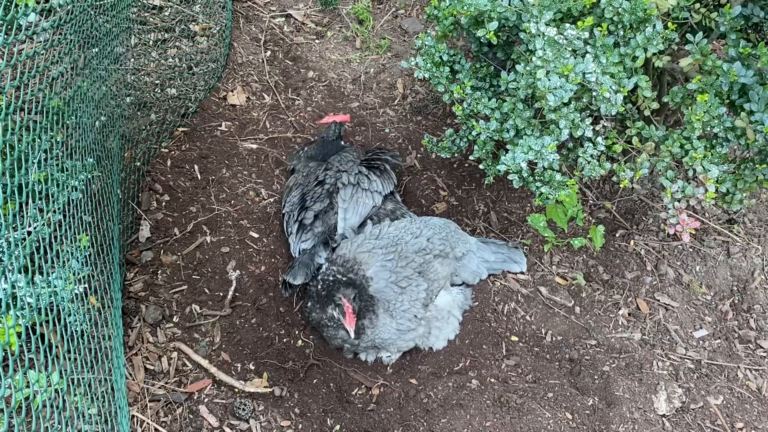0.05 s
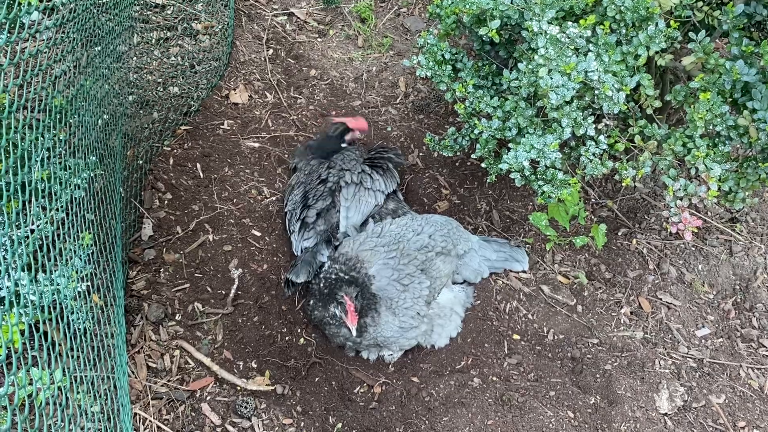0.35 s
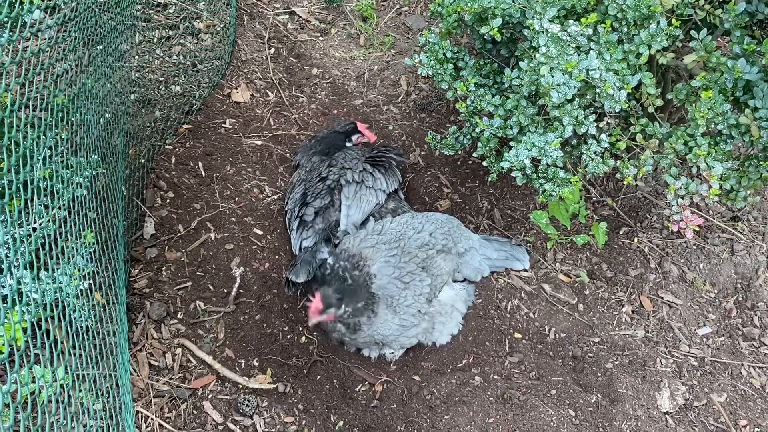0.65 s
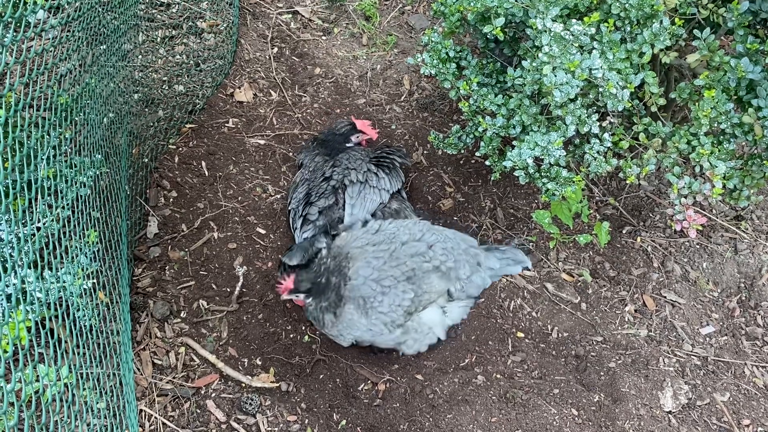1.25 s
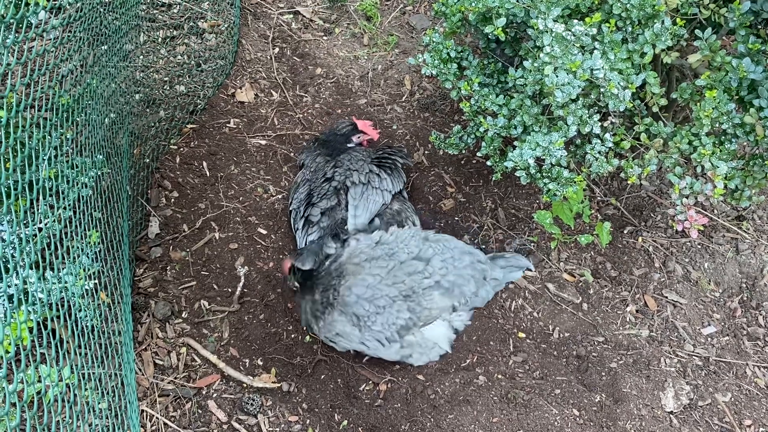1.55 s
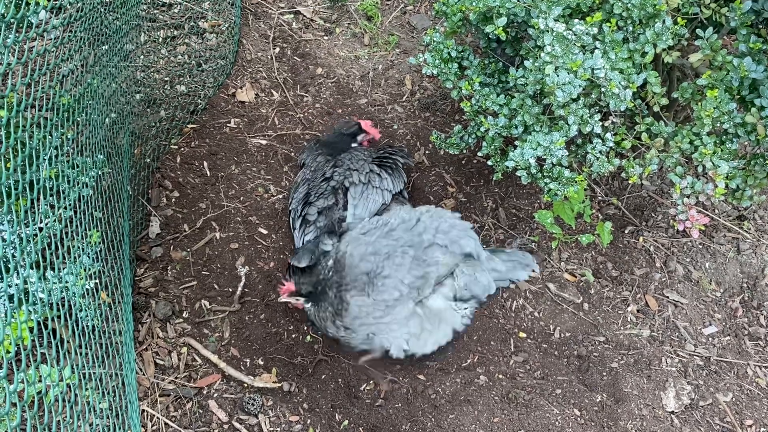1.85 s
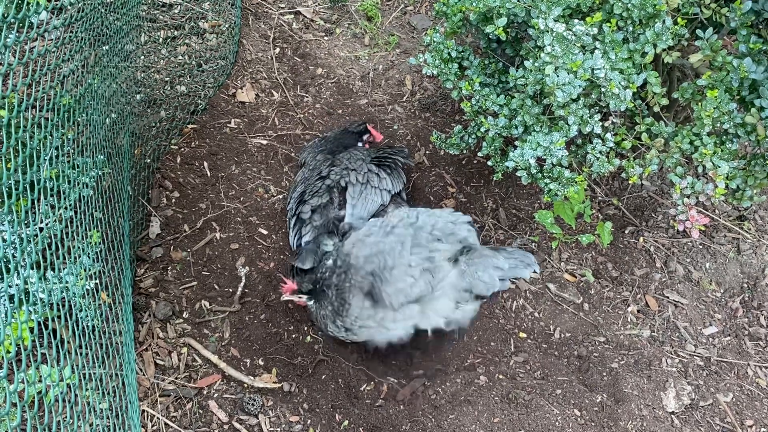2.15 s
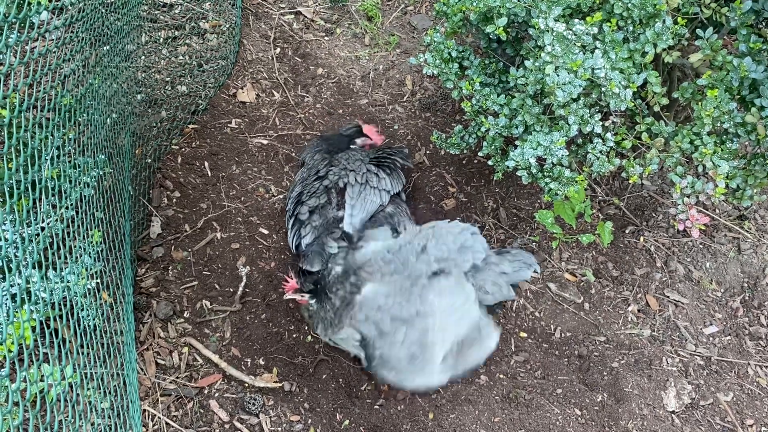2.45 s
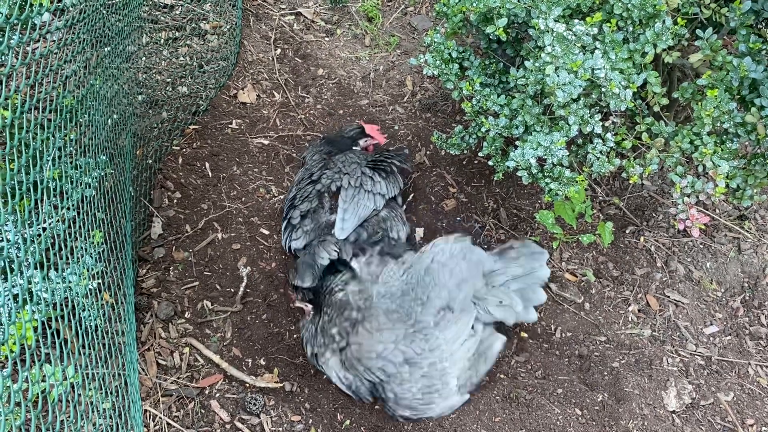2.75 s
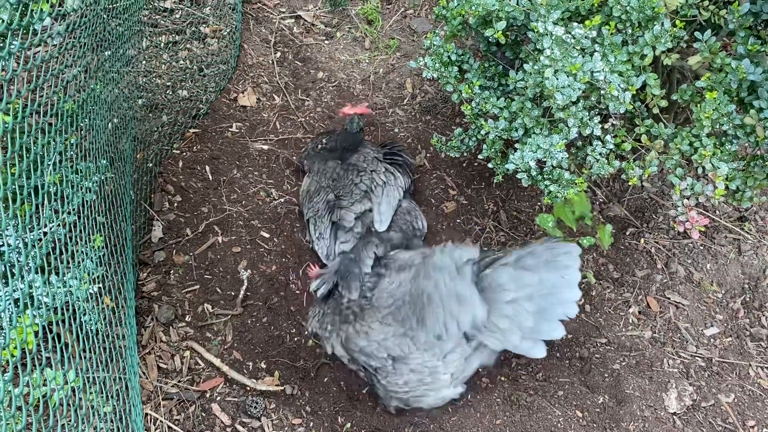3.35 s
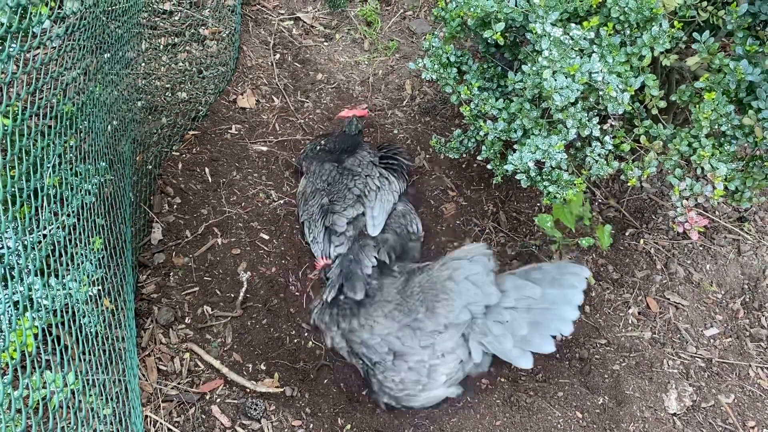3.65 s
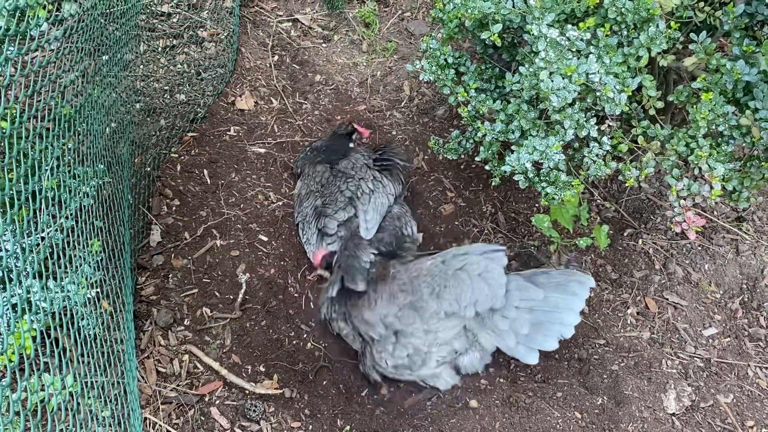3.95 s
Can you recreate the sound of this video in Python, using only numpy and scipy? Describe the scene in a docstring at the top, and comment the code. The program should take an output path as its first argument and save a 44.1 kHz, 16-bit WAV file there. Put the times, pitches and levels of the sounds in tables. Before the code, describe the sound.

Hens rustle their feathers in dry soil close by: a soft swish at about 0.6 seconds fades, then quick bursts run from 2 seconds to the end. Crumbs tick from 1.5 seconds. A small bird on the left chirps near 1.5, 2.8 and 3.9 seconds, with fainter notes farther off. Wind rumbles and thumps on the microphone, most at the start and around 3 seconds, over distant traffic hum.

```python
"""Hens dust-bathing in a yard

Close below the microphone, two hens shuffle and ruffle their feathers in dry soil, flicking up
crumbs that tick as they land. A small bird chirps three times from the trees on the left, with fainter
falling notes farther off. Distant traffic hums; light wind rumbles and thumps on the microphone."""
import sys
import numpy as np
from scipy import signal
from scipy.fft import rfft, irfft, next_fast_len
from scipy.io import wavfile
from scipy.ndimage import uniform_filter1d, map_coordinates

SR = 44100
rng = np.random.default_rng(int(sys.argv[2]) if len(sys.argv) > 2 else 0)


def put_to_file(sound):
    """Save the sound as 16-bit audio at rate SR, in the file named by the first command-line argument."""
    columns = np.atleast_2d(sound).T  # one column per channel
    safe = np.clip(columns, -1, 1)
    whole_steps = np.round(safe * 32767)
    wavfile.write(sys.argv[1], SR, whole_steps.astype(np.int16))


N = 176400

# Levels in the tables are relative: each source sets its own gain on top.
# feathers rubbing over soil: time_s, level_db
FEATHER_LEVEL = [(0, -102), (.5, -100), (.58, -72), (.66, -64), (.82, -67), (1.05, -68.5), (1.3, -73),
                 (1.6, -76), (1.69, -77), (1.86, -81), (1.94, -74), (2.02, -93), (2.1, -72), (2.17, -88),
                 (2.27, -70), (2.33, -75.5), (2.42, -76.5), (2.51, -68), (2.56, -72), (2.63, -67.5),
                 (2.71, -75.5), (2.87, -64.5), (2.93, -70), (3.01, -73), (3.06, -62.5), (3.11, -70),
                 (3.19, -71.5), (3.27, -66.5), (3.36, -68.5), (3.44, -76), (3.5, -62), (3.55, -68.5),
                 (3.61, -64.5), (3.66, -72.5), (3.73, -65), (3.85, -67.5), (4, -76)]
# tone of the swish: frequency_hz, density_db
FEATHER_SPECTRUM = [(600, -16), (1500, 11), (2600, 8.5), (4000, 4.5), (5500, 3.5), (7400, 2), (8300, 6.5),
                    (9900, 3.5), (11200, 1.5), (12300, -12), (13200, -17.5), (14200, -19), (15200, -29)]
# left-right likeness of the swish: frequency_hz, coherence
FEATHER_COHERENCE = [(2000, 0.35), (4000, 0.45), (6500, 1), (7600, 0.57), (8300, 0.98), (10000, 0.87),
                     (10700, .99)]
# crumbs and twigs ticking: start_s, peak_db, centre_hz, t60_s
CRUMB_TICKS = [(1.505, -52, 9000, .012), (1.552, -45.5, 6960, .012), (1.718, -59, 8000, 0.019),
               (1.734, -51.5, 6790, 0.033), (1.734, -53, 2760, 0.022), (1.891, -52, 5930, 0.0088),
               (1.928, -54, 6500, .009), (1.942, -58, 7000, .012), (2.059, -47, 10000, 0.013),
               (2.108, -59, 6500, 0.018), (2.150, -51, 6140, 0.031), (2.206, -59, 3900, .009),
               (2.251, -54, 11000, .01), (2.263, -52, 9500, 0.025), (2.275, -55, 7000, .026),
               (2.315, -57, 5500, .009), (2.75, -53, 5900, 0.012), (3.22, -50.5, 5200, 0.012),
               (3.772, -42.5, 6640, .013), (3.894, -45, 2400, 0.019)]
# tone shared by all ticks: frequency_hz, gain_db
CRUMB_COLOUR = [(2000, 7), (9000, 3.5), (11500, -1.5), (13500, -17), (16000, -14)]
# how far the left microphone port leads for sound from the hens: frequency_hz, phase_rad
LEFT_PORT_LEAD = [(0, 1), (1800, -1.5), (3300, 2.5), (3900, 0.64), (4900, 0.87), (5900, 0.47), (7000, 0.5),
                  (8100, -3), (9200, -4.5), (10500, -6), (11600, -26), (12700, 5.5), (14100, -21),
                  (15000, -7)]

# one chirp, a thin lead-in then a high and a lower arch: offset_s, pitch_hz, level_db
CHIRP_SHAPE = [(-.024, 5450, -26), (-.006, 5200, -17), (-.002, 5250, -35), (0, 3500, -20), (.005, 3820, 0),
               (.011, 4050, 0), (.016, 4400, -4), (.022, 4520, -1), (.027, 4150, -4), (.031, 3500, -4),
               (.036, 2950, -8), (.044, 3100, -9), (.052, 2800, -14), (.061, 3050, -5), (.069, 3280, -9),
               (.076, 3560, -4), (.082, 3730, -4), (.088, 3150, -4), (.098, 2950, -9), (.114, 2500, -20)]
# chirps from the trees: time_s, level_db, length_ratio
NEAR_CHIRPS = [(1.485, -51, 1.01), (2.751, -49, 0.99), (3.88, -50.5, .97)]
# falling notes farther off: start_s, length_s, start_hz, end_hz, level_db
FAR_NOTES = [(0.696, 0.03, 4220, 3650, -68), (0.749, 0.038, 3100, 2580, -61.5),
             (1.62, 0.046, 3300, 2750, -65.5), (3.089, .048, 4350, 3450, -63),
             (3.132, 0.046, 3300, 2750, -60)]

# deep wind rumble on the microphone: time_s, level_db
WIND_RUMBLE_LEVEL = [(0, -32), (.1, -31.5), (.42, -36), (.7, -31), (.85, -46), (1.26, -48.5), (1.36, -39),
                     (1.5, -38), (1.57, -41.5), (1.7, -34.5), (1.84, -42.5), (1.96, -39.5), (2.13, -30),
                     (2.19, -40.5), (2.4, -35), (2.48, -47), (2.55, -37), (2.73, -43.5), (2.81, -30.5),
                     (2.87, -40.5), (2.98, -32), (3.08, -27), (3.3, -33), (3.5, -36.5), (3.65, -41),
                     (4, -39)]
# tone of the rumble: frequency_hz, density_db
RUMBLE_SPECTRUM = [(12, -40), (25, -18.5), (45, 4.5), (65, 9), (95, 3.5), (130, -4), (200, -29),
                   (400, -78.5), (1500, -120)]
# wind flutter above the rumble: time_s, level_db
WIND_FLUTTER_LEVEL = [(0, -40), (.12, -40), (.2, -46.5), (.3, -36.5), (.52, -41), (.7, -44.5), (.88, -48.5),
                      (1.4, -49), (1.7, -52.5), (2.1, -46.5), (2.6, -49), (3.0, -46.5), (3.04, -30),
                      (3.15, -39), (3.22, -36.5), (3.38, -45), (3.58, -43), (3.8, -40.5), (4, -40.5)]
# tone of the flutter: frequency_hz, density_db
FLUTTER_SPECTRUM = [(15, -57), (50, -59.5), (100, -3.5), (140, -1), (200, -6.5), (300, -13), (450, -25.5),
                    (800, -55.5), (2000, -75), (5000, -120)]
# left-right likeness of the wind: frequency_hz, coherence
WIND_COHERENCE = [(30, 1), (100, 0.74), (300, 0.55)]
# sudden puffs on the microphone: start_s, level_db, mid_pitch_hz
WIND_PUFFS = [(0.011, -18.5, 81.5), (0.067, -24.5, 125.4), (0.134, -26, 84.5), (.229, -26, 150),
              (0.297, -26, 150), (.311, -28, 150), (0.357, -23, 80), (.466, -27.5, 200), (.471, -19, 68),
              (.516, -22.5, 171), (0.561, -24, 76), (0.665, -26.5, 64), (1.499, -27, 88.5),
              (1.694, -30.5, 100), (3.013, -18.5, 160), (3.033, -19.5, 130), (3.064, -30, 195),
              (3.074, -22.5, 100), (3.094, -25.5, 125), (3.111, -21, 105), (3.127, -18, 98),
              (3.147, -28, 185), (3.175, -29.5, 170), (3.187, -26.5, 90), (3.205, -24.5, 175),
              (3.217, -22.5, 160), (3.232, -31, 185), (3.247, -32, 115), (3.296, -20, 116),
              (3.635, -29, 142), (3.758, -31, 137), (3.787, -29, 104), (3.837, -24.5, 160),
              (3.897, -29, 201)]

# hum of distant traffic: time_s, level_db
HUM_LEVEL = [(0, -51), (.5, -48), (1.2, -46.5), (1.8, -47), (2.6, -46), (3.3, -47), (4, -45)]
# tone of the hum: frequency_hz, density_db
HUM_SPECTRUM = [(15, -17), (30, -4.5), (100, 7), (250, 2), (480, -1), (700, 3), (950, 2.5), (1250, -5.5),
                (1600, -10.5), (2000, -19), (3000, -26), (4500, -37), (6000, -46.5), (11000, -52),
                (14000, -65.5)]
# tyres of one louder vehicle: frequency_hz, density_db
TYRE_SPECTRUM = [(100, -45.5), (400, -31.5), (750, 2.5), (1000, 2), (1450, -5.5), (2000, -16), (3000, -29),
                 (6000, -72), (12000, -92)]
# left-right likeness of the traffic: frequency_hz, coherence
TRAFFIC_COHERENCE = [(100, 1), (300, 0.8), (600, 0.028), (1200, -0.098), (3000, 0.23)]


def hens():
    """Feathers and crumbs close below the microphone reach its two ports out of step."""
    ticks = filtered(crumbs(), lambda hz: amp(along(CRUMB_COLOUR, hz)))
    port_shift = lambda hz: np.exp(.5j * along(LEFT_PORT_LEAD, hz) * np.array([[1], [-1]]))
    return filtered(feathers() + ticks, port_shift)


def feathers(grains_per_s=830, spread_db=2.5, grain_db=-4.5, gain_db=5, flicker_db=1.94):
    """Feathers rub over dry soil: a soft swish with fine grains of dust in it."""
    grains = (rng.random(N) < grains_per_s / SR) * rng.choice([-1, 1], (2, N))
    sizes = amp(spread_db * np.minimum(rng.exponential(size=N), 4))
    friction = noise() + amp(grain_db) * unit(grains * sizes)
    swish = coloured(friction, FEATHER_SPECTRUM, FEATHER_COHERENCE)
    return amp(curve(FEATHER_LEVEL) + gain_db + flicker_db * wobble(45)) * swish


def crumbs(width_octaves=.66, gain_db=-.5):
    """Each crumb lands with a dry tick around its own pitch, from a sharp snap to a short crunch."""
    track, t = np.zeros((2, N)), np.arange(SR // 20) / SR
    hz = np.fft.rfftfreq(len(t), 1 / SR) + 1
    for start_s, peak_db, centre_hz, t60_s in CRUMB_TICKS:
        band = 1 / (1 + (np.log2(hz / centre_hz) / width_octaves) ** 2)
        tick = irfft(rfft(rng.standard_normal(len(t))) * band, len(t)) * amp(-60 * t / t60_s)
        tick *= amp(peak_db + gain_db) / np.abs(tick).max()
        add(track, start_s, yard(tick, wet_db=-13))
    return track


def near_bird():
    """A small bird in the trees whistles one chirp shape three times, barely varying its length."""
    track = np.zeros((2, N))
    offsets, pitches, levels = np.transpose(CHIRP_SHAPE)
    for time_s, level_db, length_ratio in NEAR_CHIRPS:
        t = np.arange(offsets[0], offsets[-1], 1 / SR / length_ratio)
        gain = amp(level_db + np.interp(t, offsets, levels))
        add(track, time_s + offsets[0], whistle(np.interp(t, offsets, pitches), gain, wet_db=-3.5))
    return track


def far_bird(ease=1.8):
    """Farther off, soft whistled notes fall and level out."""
    track = np.zeros((2, N))
    for start_s, length_s, start_hz, end_hz, level_db in FAR_NOTES:
        progress = np.linspace(0, 1, int(length_s * SR))
        hz = end_hz + (start_hz - end_hz) * (1 - progress) ** ease
        swell = np.sqrt(np.abs(np.sin(np.pi * progress)))
        add(track, start_s, whistle(hz, amp(level_db) * swell, wet_db=-4))
    return track


def whistle(hz, gain, wet_db, rasp_depth=.026, rasp_hz=700, glide_s=.003):
    """A slightly raspy whistle that turns smoothly, blurred by the yard's echoes."""
    rasp = 1 + rasp_depth * wobble(rasp_hz)[:len(hz)]
    glide = uniform_filter1d(hz, int(glide_s * SR))
    tone = gain * np.sin(2 * np.pi * np.cumsum(glide * rasp) / SR)
    return fences(yard(tone, wet_db))


def wind(rumble_db=1, flutter_db=.5, lump_db=2.5, slap_db=-9.5, slap_ratio=1.9):
    """Light wind on the microphone: a deep rumble, a lumpy flutter and short puffs."""
    rumble = coloured(noise(), RUMBLE_SPECTRUM, WIND_COHERENCE)
    rumble *= amp(curve(WIND_RUMBLE_LEVEL) + rumble_db)
    flutter = coloured(noise() * amp(lump_db * wobble(50)), FLUTTER_SPECTRUM, WIND_COHERENCE)
    flutter *= amp(curve(WIND_FLUTTER_LEVEL) + flutter_db)
    puffs = np.zeros(N)
    for start_s, level_db, hz in WIND_PUFFS:
        slap = amp(slap_db) * puff(hz * slap_ratio)  # a shorter, higher onset
        add(puffs, start_s, amp(level_db) * (puff(hz) + slap))
    return rumble + flutter + puffs


def puff(mid_hz, rise_cycles=.68, sag=.51):
    """Air thumps the microphone: a few low cycles swell quickly, sag in pitch and die."""
    age = mid_hz * np.arange(SR // 8) / SR / rise_cycles  # 1 at the top of the swell
    hz = mid_hz * (1 + sag * (2 * np.exp(-age / 2) - 1))
    return age * np.exp(1 - age) * np.sin(2 * np.pi * np.cumsum(hz) / SR)


def traffic(swell_db=.6, leaving_db=-46.5, fade_db_per_s=8.5):
    """A wide, soft hum of far-off tyres, with one vehicle drawing away."""
    hum_gain = amp(curve(HUM_LEVEL) + swell_db * wobble(6.73))
    hum = hum_gain * coloured(noise(), HUM_SPECTRUM, TRAFFIC_COHERENCE)
    fade = amp(leaving_db - fade_db_per_s * np.arange(N) / SR)
    return hum + fade * coloured(noise(), TYRE_SPECTRUM, TRAFFIC_COHERENCE)


def yard(x, wet_db, t60_s=.32):
    """Trees and fences scatter a short stereo tail behind the direct sound."""
    t = np.arange(SR // 2) / SR
    echoes = rng.standard_normal((2, len(t))) * amp(-60 * t / t60_s)
    echoes *= amp(wet_db) / np.linalg.norm(echoes[0])
    echoes[:, 0] += 1
    return signal.fftconvolve(x[None], echoes, axes=1)


def fences(x, count=8, delay_range_s=(.003, .022), wet_db=-1):
    """Nearby fences and the ground add a few quick reflections, each from its own side."""
    echoes = np.zeros((2, SR // 10))
    echoes[:, 0] = 1
    delays = (rng.uniform(*delay_range_s, count) * SR).astype(int)
    sides = np.sqrt(rng.dirichlet([2, 2], count).T * 2)
    echoes[:, delays] += amp(wet_db) / np.sqrt(count) * sides * rng.choice([-1, 1], count)
    return signal.fftconvolve(x, echoes, axes=1)


def amp(db):
    """Decibels as a gain."""
    return 10 ** (np.asarray(db) / 20)


def unit(x):
    """Scale to rms 1."""
    return x / np.sqrt(np.mean(x ** 2) + 1e-20)


def along(rows, hz):
    """Read (frequency_hz, value) rows along a log frequency axis."""
    frequencies, values = np.transpose(rows)
    return np.interp(np.log(hz + 1), np.log(frequencies + 1), values)


def curve(rows):
    """One value per sample from (time_s, value) rows."""
    return np.interp(np.arange(N) / SR, *np.transpose(rows))


def wobble(rate):
    """A smooth random curve, rate knots a second."""
    knots = rng.standard_normal(int(N * rate / SR) + 4)
    return map_coordinates(knots, [np.arange(N) * rate / SR])


def noise():
    """Two unrelated white noises."""
    return rng.standard_normal((2, N))


def filtered(x, response):
    """Pass x through a frequency response."""
    size = next_fast_len(N + SR // 2)
    return irfft(rfft(x, size) * response(np.fft.rfftfreq(size, 1 / SR)), size)[..., :N]


def coloured(pair, spectrum, coherence):
    """Two unrelated signals become a stereo sound of rms 1 with this spectrum and coherence."""
    def mid_side_gains(hz):
        angle = np.arccos(np.clip(along(coherence, hz), -1, 1)) / 2
        return amp(along(spectrum, hz)) * [np.cos(angle), np.sin(angle)]
    mid, side = filtered(pair, mid_side_gains)
    return unit(np.array([mid + side, mid - side]))


def add(track, start_s, sound):
    """Mix a sound into the track at start_s."""
    i = max(0, round(start_s * SR))
    track[..., i:i + sound.shape[-1]] += sound[..., :N - i]


def pan(left_db):
    """Stereo gains with the left side louder by left_db."""
    return amp(np.array([[left_db], [-left_db]]) / 2)


def scene():
    """Hens close and near the centre, birds off to the left, traffic and wind all around."""
    return hens() * pan(1.2) + near_bird() * pan(5.5) + far_bird() * pan(5) + traffic() + wind()


def record(dry):
    """The recorder cuts off steeply at the top of its band."""
    top_hz = 15700
    return filtered(dry, lambda hz: 1 / np.sqrt(1 + (hz / top_hz) ** 60))


dry = scene()
out = record(dry)
put_to_file(out)
```